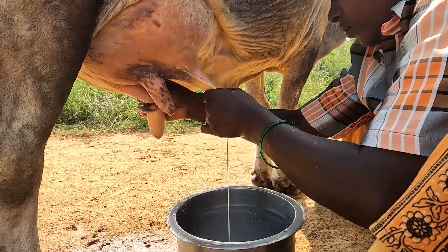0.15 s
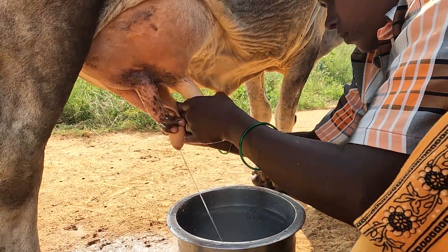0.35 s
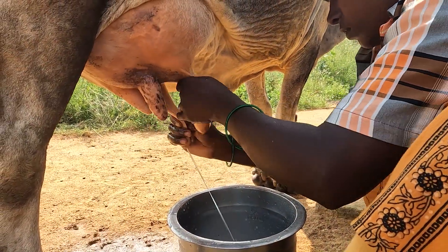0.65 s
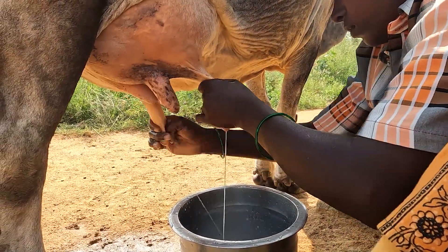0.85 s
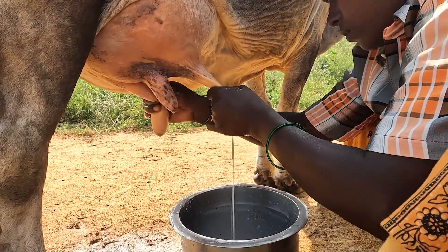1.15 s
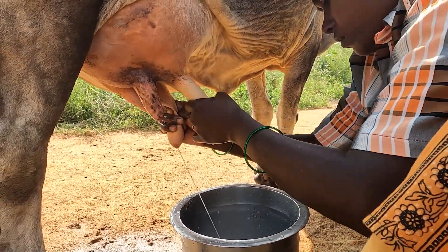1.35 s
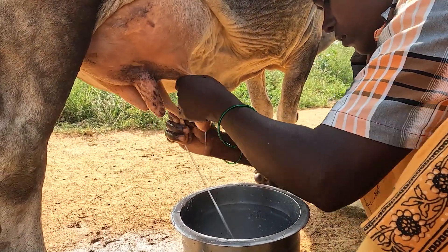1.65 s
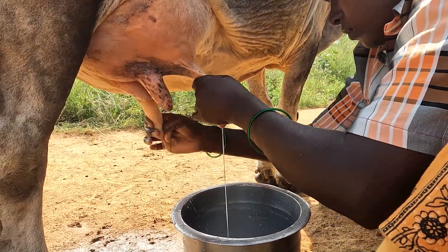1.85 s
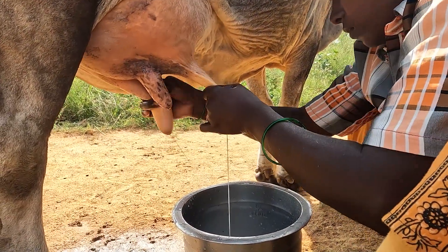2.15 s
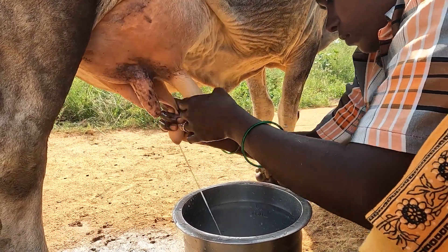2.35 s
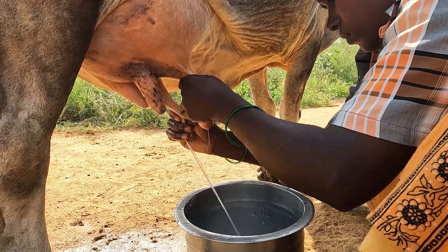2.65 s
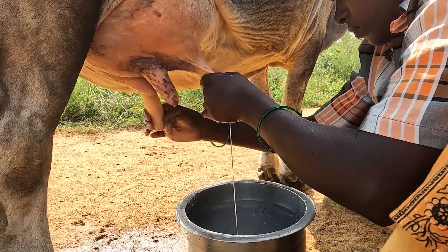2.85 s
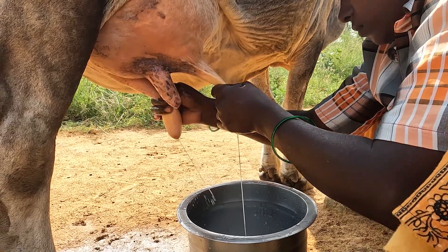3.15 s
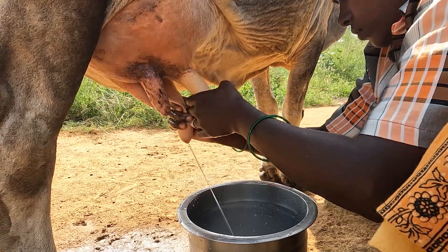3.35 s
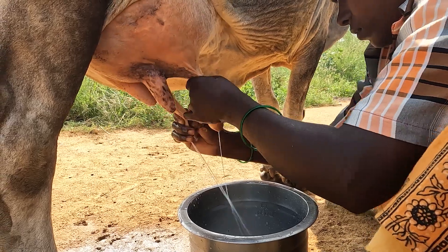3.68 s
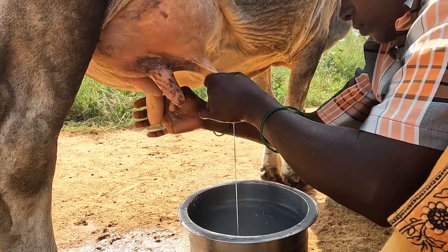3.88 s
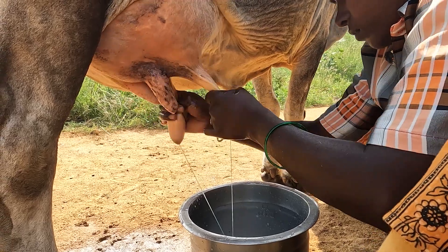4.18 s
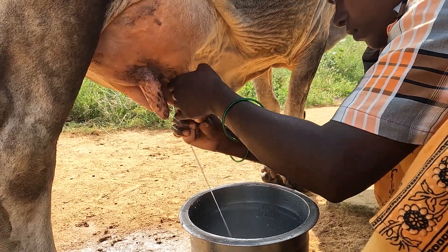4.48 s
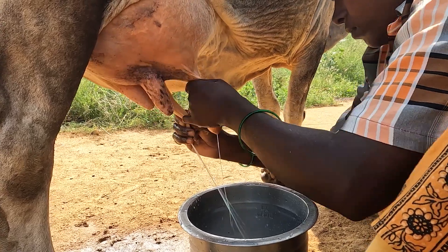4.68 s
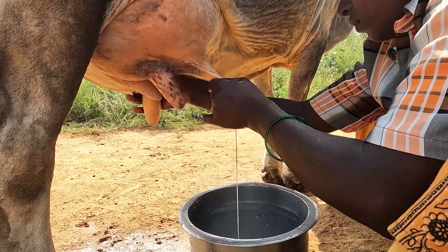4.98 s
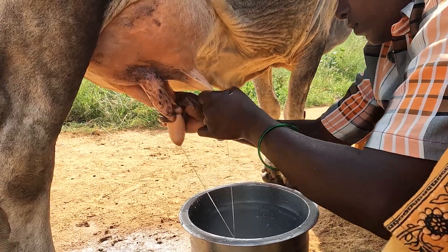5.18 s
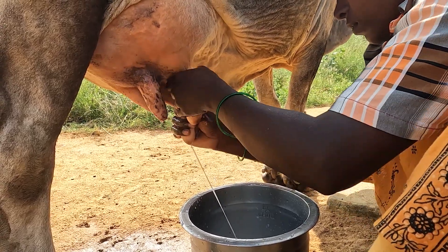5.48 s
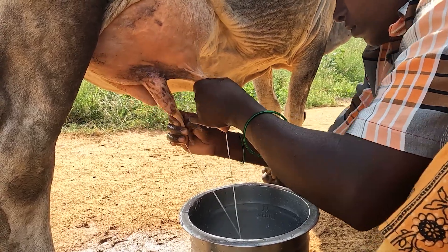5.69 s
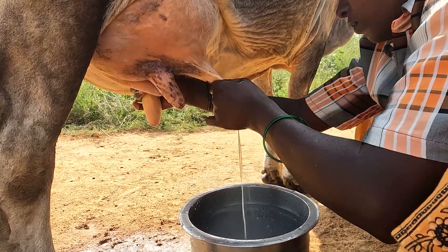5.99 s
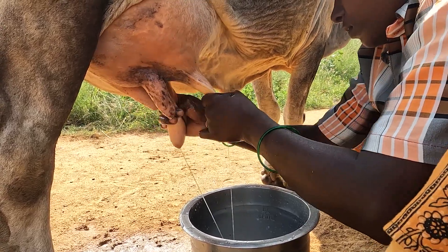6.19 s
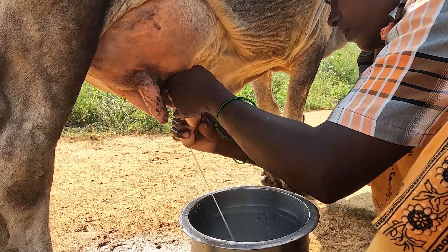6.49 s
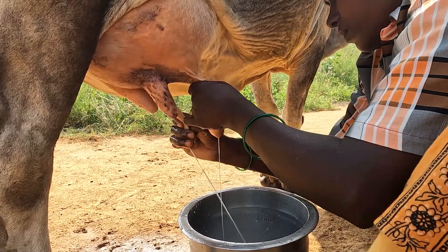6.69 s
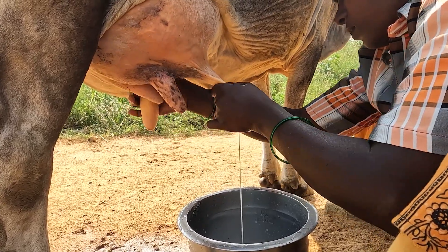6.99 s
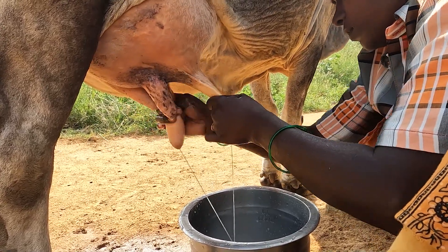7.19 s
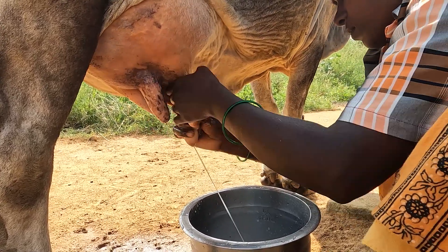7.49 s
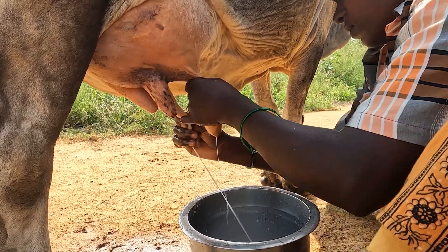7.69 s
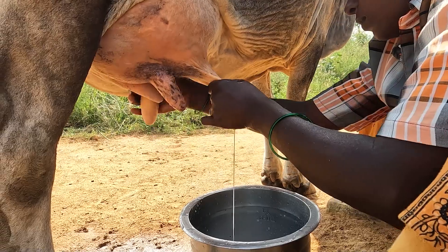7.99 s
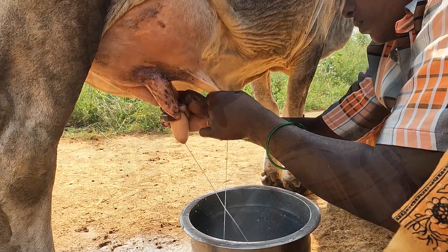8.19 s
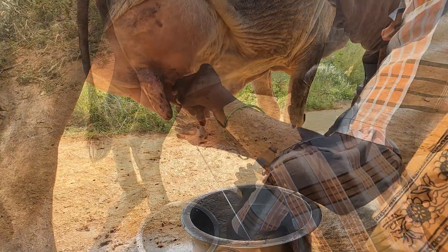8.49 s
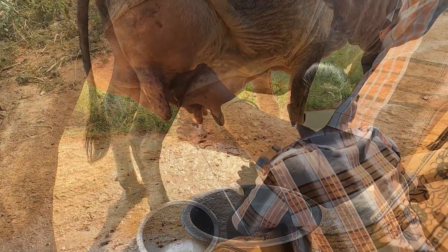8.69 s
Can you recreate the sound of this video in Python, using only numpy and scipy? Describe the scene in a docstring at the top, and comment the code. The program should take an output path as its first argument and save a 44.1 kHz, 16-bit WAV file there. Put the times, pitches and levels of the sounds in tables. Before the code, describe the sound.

Close stereo pickup outdoors of a cow being milked by hand. Alternating jets squirt into a steel pot roughly twice a second, one deeper and gurgling, the other brighter and splashier. Bubbly froth, fine spray, hollow gulps and pinging drips sit over a low rumble and faint hiss. It starts quietly, strengthens, then cuts off near the end, leaving silence and a barely audible rumble.

```python
"""A low outdoor rumble and a far hiss, then two jets of milk taking turns to squirt into a steel pot by hand.
Each jet is a rain of bubbles and spray coloured by the pot wall, and its plunging drives the pot's air column.
Jets surge in short swells, lumps of milk gulp as wavering tones, single bubbles and high drips are damped sines.
The sound rises slowly, stops dead, and after a short silence a faint rumble creeps back."""
import sys
import numpy as np
from scipy import signal
from scipy.fft import rfft, irfft, next_fast_len
from scipy.io import wavfile
from scipy.ndimage import uniform_filter1d, map_coordinates

SR = 44100
rng = np.random.default_rng(int(sys.argv[2]) if len(sys.argv) > 2 else 0)


def dump(signal):
    """Clip the signal to [-1, 1] and save it as 16-bit WAV at the path in sys.argv[1]."""
    limited = np.clip(np.atleast_2d(signal).T, -1, 1)
    pcm = np.round(limited * 32767).astype(np.int16)
    wavfile.write(sys.argv[1], SR, pcm)


N = 389844

# Level of the open air around the pot. Each row: time in seconds, rumble level in dB.
OUTDOOR_LEVEL = [(0.0, -47), (0.43, -47.5), (0.6, -41), (1.3, -41.5), (5, -40.5), (8.6, -39.5)]
# Quarter-wave modes of the air in the pot, lowest first.
# Each row: pitch in Hz, width in Hz of the plain resonance, power it is raised to (steepness of the skirts).
AIR_COLUMN = [(381, 118, 2.44), (1105, 152, 0.71)]
# Squeezes of a teat, far hand and near hand in turn. Each row: start in seconds, length in s,
# froth crest in s after the start, froth crest in dB, spray crest in s after the start, spray crest in dB,
# mist in dB over its share of the spray, boom delay in s, boom length in s, boom crest in s after the boom's
# own start, boom crest in dB, overtone crest in dB (it peaks with the spray).
SQUEEZES = [(0.0, 0.39, 0.35, -49, 0.11, -50.5, -26, 0.11, 0.32, 0.043, -47, -57.5),
            (0.448, 0.5, 0.31, -38.5, 0.29, -42, -7, 0.12, 0.4, 0.09, -48, -50.5),
            (0.947, 0.44, 0.24, -42.5, 0.024, -45, -7.5, 0.1, 0.67, 0.21, -42.5, -51),
            (1.414, 0.57, 0.25, -37, 0.34, -40, 5.5, 0.046, 0.3, 0.14, -42, -45.5),
            (1.953, 0.39, 0.37, -38.5, 0.064, -42, 1, 0.028, 0.33, 0.21, -38.5, -49.5),
            (2.45, 0.43, 0.26, -33, 0.3, -36.5, 2.5, 0.053, 0.35, 0.2, -39.5, -45.5),
            (2.889, 0.44, 0.77, -33.5, 0.35, -44, -1.5, 0.13, 0.38, 0.2, -37, -44),
            (3.39, 0.45, 0.28, -35, 0.3, -34, 0, 0.14, 0.36, .08, -43, -43.5),
            (3.9, 0.45, 0.77, -33, 0.025, -41, -2, 0.15, 0.33, 0.19, -38, -45.5),
            (4.387, 0.53, 0.33, -34, 0.3, -35.5, 5.5, 0.098, 0.37, 0.3, -39, -43),
            (4.93, 0.37, 0.3, -34.5, 0.025, -38.5, -2.5, .12, 0.31, 0.059, -36, -45.5),
            (5.393, 0.48, 0.21, -33.5, 0.37, -37, -3, 0.14, 0.59, 0.02, -41.5, -44.5),
            (5.902, 0.41, 0.41, -35.5, 0.3, -38, 6, 0.022, 0.37, 0.45, -36, -48),
            (6.325, 0.55, 0.27, -31.5, 0.34, -31.5, 2, 0.098, 0.34, 0.14, -40.5, -46),
            (6.895, 0.36, 0.36, -38, 0.074, -44.5, 4, 0.073, 0.49, 0.18, -38.5, -45.5),
            (7.357, 0.53, 0.4, -33.5, 0.48, -32.5, -6, 0.12, 0.39, 0.19, -39, -44),
            (7.926, 0.36, 0.32, -37, 0.065, -41, 2.5, 0.099, 0.4, 0.22, -40.5, -47),
            (8.417, 0.49, .05, -39, 0.14, -37.5, 2, 0.049, 0.21, 0.24, -38, -44)]
ATTACK_S, RELEASE_S, SPRAY_RELEASE_S = 0.0011, 0.022, 0.028  # edges of a jet; the spray thins out more slowly


def amp(db):
    """dB to gain."""
    return 10 ** (np.asarray(db) / 20)


def unit(x):
    """Scale to rms 1."""
    return x / np.sqrt(np.mean(x ** 2) + 1e-20)


def along(points, hz):
    """Read a curve of (Hz, value) points on a log frequency axis."""
    f, v = np.transpose(points)
    return np.interp(np.log(hz + 1), np.log(f + 1), v)


def curve(points):
    """One value per sample from (seconds, value) points."""
    s, value = np.transpose(points)
    return np.interp(np.arange(N) / SR, s, value)


def wobble(rate):
    """A smooth random curve, rate knots a second."""
    return map_coordinates(rng.standard_normal(int(N * rate / SR) + 4), [np.arange(N) * rate / SR])


def filtered(x, response):
    """Filter x by a complex response of frequency."""
    m = next_fast_len(N + SR // 2)
    return irfft(rfft(x, m) * response(np.fft.rfftfreq(m, 1 / SR)), m)[..., :N]


def resonance(f, hz, width):
    """One mode, gain 1 at its peak."""
    return 1j * f * width / (hz * hz - f * f + 1j * f * width)


def coloured(x, spectrum):
    """Replace the average colour of x by the given one, rms 1."""
    hz, power = signal.welch(x, SR, nperseg=256)
    return unit(filtered(x, lambda f: amp(along(spectrum, f)) / np.sqrt(np.interp(f, hz, power) + 1e-12)))


def patchy(x, depth_db):
    """Shift the colour at random in patches some 200 Hz wide and 50 ms long."""
    z = signal.stft(x, nperseg=512)[2]
    field = uniform_filter1d(rng.standard_normal(z.shape), size=2, axis=0)
    field = uniform_filter1d(field, size=9, axis=1)
    return signal.istft(z * amp(depth_db * unit(field)), nperseg=512)[1][:N]


def bubbles(s, gain, hz, cycles, rise, size, onset=12):
    """Damped sines with a soft start; the pitch climbs as each bubble nears the surface."""
    age = np.arange(size) / SR * hz[:, None] / cycles  # 1 = faded by 20 dB
    wave = np.sin(2 * np.pi * cycles * age * (1 + rise * age / 2))
    wave *= gain[:, None] * amp(-20 * age) * (1 - np.exp(-onset * age))
    wave *= np.hanning(2 * size)[size:]  # fade the tail to nothing
    where = np.round(s * SR).astype(int)[:, None] + np.arange(size)
    return np.bincount(where.ravel(), wave.ravel(), N + size)[:N]


def swarm(count, size, hz, octaves, cycles, scatter_db):
    """A steady random rain of bubbles of many sizes, rms 1."""
    u, z = rng.random((count, 2)), rng.standard_normal(count)
    pitch = np.clip(hz * 2 ** (octaves * z), 300, 15000)
    gain = amp(-scatter_db * np.log(1 - u[:, 1]).clip(-4))  # many soft, few loud
    return unit(bubbles(u[:, 0] * (N - 1) / SR, gain, pitch, cycles, 0.074, size))


def stroke_gain(start, length, crest, crest_db, slopes, attack_s, release_s, dribble_db):
    """Each squeeze opens fast, climbs to its crest, sags and shuts; a dribble bridges the gaps."""
    t = np.arange(0, N + 64, 32) / SR
    age = t - start[:, None]
    climb, sag = np.array(slopes)[np.arange(len(start)) % 2].T[..., None]
    late = age - crest[:, None]
    opening = 1 / (1 + np.exp(np.clip(-age / attack_s, -50, 50)))
    shutting = 1 / (1 + np.exp(np.clip((age - length[:, None]) / release_s, -50, 50)))
    level_db = crest_db[:, None] + np.where(late < 0, climb * late, -sag * late)
    power = (amp(level_db) * opening * shutting) ** 2
    mean_crest_db = uniform_filter1d(crest_db, size=3)  # over neighbouring squeezes
    dribble = amp(np.interp(t, start + crest, mean_crest_db) + dribble_db)
    return np.interp(np.arange(N) / SR, t, np.sqrt(power.sum(axis=0) + dribble ** 2))


def surged(gain, s, width, db):
    """Add short swells to a level, quicker up than down."""
    skew = 0.83  # narrows the rise and widens the fall by this factor
    t = np.arange(0, N + 64, 32) / SR
    late = (t - s[:, None]) / width[:, None]
    late = np.where(late < 0, late / skew, late * skew)
    swell = amp(db[:, None] - 12 * late ** 2) ** 2  # half power where late is a half
    return np.sqrt(gain ** 2 + np.interp(np.arange(N) / SR, t, swell.sum(axis=0)))


def far(spectrum):
    """Far noise of the open air with a slowly wavering level, rms 1."""
    noise = filtered(rng.standard_normal(N), lambda hz: amp(along(spectrum, hz)))
    return unit(noise * amp(1.1 * wobble(4.1)))


def outdoor_rumble():
    """Low noise of the open place, rms 1."""
    # Colour of the rumble. Each row: frequency in Hz, relative level in dB per Hz.
    rumble_colour = [(8, -42), (14, 2), (24, -3.5), (33, 1.5), (45, -1.5), (60, -0.5), (75, -7), (95, -3.5),
                     (130, -7), (200, -11.5), (280, -17.5), (450, -19.5), (600, -40), (900, -59)]
    return far(rumble_colour)


def far_hiss():
    """A distant hiss whose colour shifts in patches, near rms 1."""
    # Colour of the hiss. Each row: frequency in Hz, relative level in dB per Hz.
    hiss_colour = [(290, -48.5), (500, -17), (720, -8), (1100, -5), (1410, 3), (2470, 3), (3200, -21),
                   (4650, -11), (12200, -17.5), (15600, -56.5)]
    return patchy(far(hiss_colour), depth_db=4.5)


def shrill():
    """A thin wavering hiss, unrelated at the two ports, that dips between squeezes."""
    hz, width_hz = 12600, 1100  # the resonance is applied twice
    hiss = filtered(rng.standard_normal((2, N)), lambda f: resonance(f, hz, width_hz) ** 2)
    s, length = np.transpose(SQUEEZES)[:2]
    # climb and sag of 8 dB per s for both hands
    squeeze = stroke_gain(s, length, length / 2, 0 * s, [(8, 8)] * 2, ATTACK_S, SPRAY_RELEASE_S, dribble_db=0)
    return amp(-28.5 + 2.5 * wobble(7) + 3 * wobble(60)) * squeeze * unit(hiss)


def burble():
    """As the far jet takes over from the near one, large bubbles gurgle briefly."""
    s = np.transpose(SQUEEZES)[0]
    hand_db = np.array([-48.5, -70])[np.arange(len(s)) % 2]  # far hand, near hand (next to nothing)
    # the gurgle follows the outdoor level, relative to its last value
    db = hand_db + np.interp(s, *np.transpose(OUTDOOR_LEVEL)) - OUTDOOR_LEVEL[-1][1]
    gain = surged(0, s, width=np.full(len(s), 0.15), db=db)
    return gain * swarm(count=2500, size=900, hz=976, octaves=0.36, cycles=8.0, scatter_db=7.0)


def gulps():
    """A lump of milk plunges and rings the lowest air mode: a soft swell whose pitch wavers."""
    # Lumps plunging into the pot. Each row: swell centre in seconds, width in s, peak in dB before the waver.
    lumps = [(0.205, 0.0068, -38), (0.664, 0.0075, -41), (1.079, 0.0074, -41), (1.138, 0.0059, -40),
             (1.281, 0.0053, -45.5), (1.677, 0.026, -38), (1.885, 0.017, -31.5), (2.174, 0.021, -34),
             (2.29, 0.011, -33), (2.337, 0.014, -30.5), (2.572, 0.019, -33.5), (3.183, 0.017, -34),
             (3.263, 0.011, -32.5), (3.387, 0.016, -37.5), (3.594, 0.0094, -33), (3.641, 0.013, -34),
             (4.125, 0.02, -35), (4.189, 0.011, -37), (4.32, 0.0089, -34), (4.599, 0.011, -30.5),
             (4.639, 0.015, -32.5), (4.782, 0.011, -38), (5.137, 0.0097, -36.5), (5.248, 0.015, -37.5),
             (5.277, 0.01, -35.5), (5.335, 0.025, -37.5), (5.615, 0.0074, -35), (6.083, 0.011, -41),
             (6.267, 0.0091, -28), (6.584, 0.014, -36), (6.658, 0.014, -35), (6.694, 0.015, -40),
             (6.761, 0.0079, -34.5), (7.024, 0.0074, -37.5), (7.051, 0.01, -33), (7.099, 0.014, -34.5),
             (7.178, 0.014, -33.5), (7.302, 0.0095, -37), (7.601, 0.029, -40), (8.148, 0.0087, -34.5),
             (8.222, 0.014, -33)]
    s, width, db = np.transpose(lumps)[..., None]
    step = np.arange(-4000, 4000)
    where = (np.round(s * SR).astype(int) + step).clip(0, N - 1)
    hz = AIR_COLUMN[0][0] * (1 + 0.0711 * wobble(45))
    tone = np.sqrt(2) * np.sin(2 * np.pi * np.cumsum(hz) / SR) * amp(2.3 * wobble(60))
    swell = amp(db - 12 * (step / SR / width) ** 2)
    return tone * np.bincount(where.ravel(), swell.ravel(), N)


def plops_and_drips():
    """Single bubbles and high drips that stand out of the froth: damped sines, each opened by a tick."""
    # Single bubbles and high drips.
    # Each row: start in seconds, level in dB (trimmed below for ring and tick), pitch in Hz.
    single_drops = [(0.179, -28.5, 3070), (0.996, -35, 814), (1.891, -34, 1080), (1.975, -25.5, 1160),
                    (2.5014, -22.5, 2790), (2.591, -17.5, 2700), (2.955, -19, 3660), (2.975, -29, 950),
                    (3.0166, -32, 5200), (3.0873, -20, 2820), (3.2262, -23, 2490), (3.3584, -29, 5070),
                    (3.452, -38, 890), (4.282, -18.5, 2370), (4.2957, -25, 5600), (4.3955, -30, 4400),
                    (4.432, -33, 1150), (4.4359, -23.5, 5030), (4.9706, -19.5, 4050), (4.976, -28, 1120),
                    (5.306, -34.5, 6800), (5.354, -33, 6000), (5.837, -32.5, 1190), (5.848, -31, 1180),
                    (5.869, -25.5, 1130), (5.906, -28, 1147), (5.959, -25.5, 2460), (6.066, -27, 1120),
                    (6.2396, -19.5, 2480), (6.3608, -27.5, 2220), (6.915, -33, 1090), (6.953, -28, 1100),
                    (7.012, -30.5, 1090), (7.1252, -21, 2830), (7.6112, -14.5, 2620), (7.8926, -17, 4500),
                    (7.97, -22.5, 3370), (8.004, -25.5, 1080), (8.006, -23.5, 2740), (8.042, -18, 3500),
                    (8.179, -26, 2260), (8.46, -30.5, 870), (8.556, -35.5, 945), (8.585, -34, 846)]
    s, db, hz = np.transpose(single_drops)
    cycles = 10.3 * (2500 / hz[:, None]) ** 0.53  # low ones ring for more cycles
    ring = bubbles(s, amp(db + 1.0), hz, cycles, rise=0.027, size=900, onset=70)
    ring = ring * amp(1.5 * wobble(500))  # spray roughens the ring
    tick_hz = 6000 * 2 ** rng.normal(0, 0.95, len(s))
    return ring + bubbles(s, amp(db - 12), tick_hz, cycles=2.5, rise=0.1, size=128)


def through_wall(x):
    """The steel wall of the pot, damped by milk, adds its ringing modes to x."""
    # Modes of the wall. Each row: pitch in Hz, width in Hz, relative strength in dB.
    wall_modes = [(2586, 45, 1), (3364, 78, 2.5), (4140, 60, 9), (5170, 88, -4), (7400, 90, -9),
                  (10240, 400, 8.5)]
    modes = lambda f: sum(resonance(f, hz, width) * amp(db - 18.5) for hz, width, db in wall_modes)
    return filtered(x, lambda f: 1 + modes(f))


def froth(sputter):
    """Bubbles whipped up by the jets: deeper as the far jet goes on, brighter under the near jet; rms 1."""
    # Colour of the froth. Each row: frequency in Hz (scaled below), relative level in dB per Hz.
    froth_colour = [(710, -34), (1200, -14.5), (1390, -22.5), (1680, -5), (1890, -8.5), (2560, 2.5),
                    (3800, -9.5), (4940, -53.5), (8360, -120)]
    mix = swarm(count=19000, size=220, hz=2464, octaves=0.515, cycles=11.4, scatter_db=0)
    mix += 0.86 * rng.standard_normal(N)
    mix += 0.55 * swarm(count=1600, size=220, hz=2544, octaves=0.35, cycles=6.0, scatter_db=2.0)  # separate drops
    mix = patchy(mix, depth_db=3.0)  # the stream's point of impact wanders
    deep, bright = (coloured(mix, np.multiply(froth_colour, [shift, 1])) for shift in (0.96, 0.98))
    s, length = np.transpose(SQUEEZES)[:2]
    far_hand = np.arange(len(s)) % 2 == 0
    times = np.c_[s, s + length / 2, s + length - RELEASE_S]
    shares = np.outer(far_hand, [.5, 1, 1])
    sunk = np.interp(np.arange(N) / SR, times.ravel(), shares.ravel())  # share of the deep colour
    return unit(amp(sputter) * through_wall(sunk * deep + (1 - sunk) * bright))


def spray(sputter):
    """Droplets thrown up by the jets; the finest are a mist that hisses above the rest."""
    # Colour of the spray. Each row: frequency in Hz, relative level in dB per Hz.
    spray_colour = [(1760, -22), (3000, -2), (4060, -4.5), (4570, -8.5), (5030, -7.5), (6450, -14),
                    (7100, -14.5), (8670, -26.5), (10600, -20.5), (12700, -26), (14100, -35),
                    (15600, -54.5)]
    mix = swarm(count=45000, size=96, hz=6030, octaves=0.7, cycles=5.5, scatter_db=2.5)
    mix += 0.52 * rng.standard_normal(N)
    # droplets ticking on steel
    mix += 0.55 * swarm(count=7000, size=64, hz=5540, octaves=0.66, cycles=2.5, scatter_db=2.5)
    mix = coloured(patchy(mix, depth_db=3.5), spray_colour)  # the stream's point of impact wanders
    drops = unit(amp(1.12 * sputter) * through_wall(mix))
    mist_hz = 8000
    mist = filtered(drops, lambda f: 1 / (1 + (mist_hz / (f + 1)) ** 8))
    columns = np.transpose(SQUEEZES)
    s, length, mist_db = columns[0], columns[1], columns[6]
    mist_gain = amp(np.interp(np.arange(N) / SR, s + length / 2, mist_db) + 0.9 * wobble(130))
    return drops - mist + mist_gain * mist


def air_mode(sputter, hz, width, steep):
    """The air column of the pot, driven at one mode by lumps of milk plunging in; rms 1."""
    push = rng.standard_normal(N) * amp(1.3 * sputter + 2.4 * wobble(55))
    return unit(filtered(push, lambda f: resonance(f, hz, width) ** steep))


def jets():
    """The streams break up unevenly, so froth, spray and the pot's air all sputter together."""
    # Climb to the crest and sag after it. Each row (far hand, near hand): climb in dB per s, sag in dB per s.
    froth_slopes, spray_slopes = [(18, 23), (25, 44)], [(15, 54), (22, 15)]
    boom_slopes, overtone_slopes = [(30, 15), (35, 14)], [(4, 6.1), (4, 14)]
    # Short surges of a jet. Each row: centre in seconds, width in s, froth peak in dB, spray peak in dB.
    spurts = [(0.465, 0.03, -47, -50), (0.596, 0.023, -35.5, -49), (0.74, 0.012, -39.5, -49),
              (1.071, 0.0091, -36, -54), (1.306, 0.029, -39.5, -46), (1.447, 0.0068, -31.5, -56),
              (1.579, 0.024, -36, -53), (1.667, 0.006, -37, -40), (1.853, 0.033, -41.5, -41),
              (2.072, 0.018, -36, -56), (2.249, 0.03, -29.5, -42.5), (2.507, 0.0092, -36.5, -46),
              (2.593, 0.018, -31.5, -36), (2.612, 0.015, -28, -39.5), (2.661, 0.014, -35.5, -39.5),
              (2.693, 0.012, -29.5, -37), (2.744, 0.017, -34, -40.5), (2.956, 0.023, -38.5, -40),
              (3.089, 0.011, -34.5, -35.5), (3.179, 0.028, -32.5, -42), (3.228, 0.016, -28.5, -34),
              (3.527, 0.024, -36, -37.5), (3.566, 0.065, -33, -36.5), (3.683, 0.018, -36.5, -34.5),
              (3.738, 0.019, -34, -35.5), (3.933, 0.047, -43, -37), (4.022, 0.035, -43, -37),
              (4.235, 0.045, -32.5, -53), (4.282, 0.0036, -40, -52.6), (4.419, 0.025, -35, -39),
              (4.667, 0.0071, -29.5, -40.5), (4.723, 0.0067, -30, -37), (4.763, 0.019, -30, -33),
              (5.092, 0.016, -36.5, -47), (5.201, 0.0057, -35, -40.5), (5.416, 0.03, -32.5, -29),
              (5.483, 0.023, -31.5, -36.5), (5.545, 0.061, -31, -39), (5.699, 0.053, -34, -34.5),
              (6.052, 0.018, -31.5, -38), (6.13, 0.023, -37, -36.5), (6.222, 0.0061, -39, -47.5),
              (6.247, 0.01, -33, -51), (6.386, 0.023, -25.5, -35.5), (6.471, 0.014, -28, -34),
              (6.616, 0.013, -34, -28), (6.656, 0.011, -27, -34), (6.705, 0.026, -31, -31),
              (6.763, 0.0054, -30, -24.5), (7.129, 0.044, -34.5, -43), (7.221, 0.049, -31, -40),
              (7.562, 0.035, -30.5, -42.5), (7.623, 0.038, -34, -35), (7.651, 0.033, -31.5, -27),
              (7.706, 0.033, -33.5, -30), (7.748, 0.019, -31, -23), (8.044, 0.0084, -41, -36),
              (8.12, 0.019, -36, -42.5), (8.182, 0.014, -27.5, -41), (8.236, 0.025, -29, -41.5),
              (8.461, 0.024, -37, -34), (8.558, 0.0084, -34.5, -33.5)]
    (s, length, froth_at, froth_db, spray_at, spray_db, _,
     delay, boom_length, boom_at, boom_db, overtone_db) = np.transpose(SQUEEZES)
    # dribble_db: what is left between jets, under their mean crest
    froth_gain = stroke_gain(s, length, froth_at, froth_db, froth_slopes,
                             ATTACK_S, RELEASE_S, dribble_db=-19.5)
    spray_gain = stroke_gain(s, length, spray_at, spray_db, spray_slopes,
                             ATTACK_S, SPRAY_RELEASE_S, dribble_db=-11.5)
    boom_gain = stroke_gain(s + delay, boom_length, boom_at, boom_db, boom_slopes,
                            attack_s=0.012, release_s=0.014, dribble_db=-14.5)
    overtone_gain = stroke_gain(s, length, spray_at, overtone_db, overtone_slopes,
                                ATTACK_S, RELEASE_S, dribble_db=-5.5)
    spurt_s, spurt_width, spurt_froth_db, spurt_spray_db = np.transpose(spurts)
    froth_gain = surged(froth_gain, spurt_s, spurt_width, spurt_froth_db)
    spray_gain = surged(spray_gain, spurt_s, spurt_width, spurt_spray_db)
    sputter = 0.5 * wobble(45) + 1.4 * wobble(170)  # dB
    out = froth_gain * froth(sputter) + spray_gain * spray(sputter)
    for mode, gain in zip(AIR_COLUMN, (boom_gain, overtone_gain)):
        out += gain * air_mode(sputter, *mode)
    return out


def ports(x):
    """Two close microphone ports: a level and phase step between them, and scattered sound that differs."""
    # Likeness of the ports before the image is narrowed. Each row: frequency in Hz, left-right correlation.
    likeness = [(30, 1), (200, 1), (700, 0.97), (1500, 0.98), (3000, 0.94), (6000, 0.88), (10000, 0.88),
                (14000, 0.35)]
    # Level step between the ports. Each row: frequency in Hz, left minus right in dB.
    louder_left = [(60, 0), (200, 0), (380, -1), (700, -1), (1300, -.4), (4400, -.6), (8100, 1), (15000, 4)]
    # Phase step between the ports. Each row: frequency in Hz, left minus right in radians.
    left_lead = [(100, 0), (1000, -.2), (1700, -.35), (3000, -.8), (4800, -.45), (5900, -.7), (7200, -.3),
                 (11800, -.1), (13400, -2.5)]
    z = signal.stft(x, nperseg=256)[2]
    scrambled = z * np.exp(2j * np.pi * rng.random(z.shape))
    scattered = signal.istft(scrambled, nperseg=256)[1][:N]
    scattered *= np.std(x) / np.std(scattered)
    turn = lambda hz: np.arccos(np.clip(along(likeness, hz), 0, 1)) / 2
    step = lambda hz: np.sqrt(amp(along(louder_left, hz))) * np.exp(.5j * along(left_lead, hz))
    mid, side = filtered(np.array([x, scattered]), lambda hz: np.array([np.cos(turn(hz)), np.sin(turn(hz))]))
    return filtered(np.array([mid + side, mid - side]), lambda hz: np.array([step(hz), 1 / step(hz)]))


def scene():
    """Milking in the open up to the stop, silence, then the faint rumble in both ports alike."""
    # The image starts narrow and opens. Each row: time in seconds, gain of the side signal in dB.
    opening_image = [(0, -47), (.5, -29), (1.6, -1.5)]
    # Faint rumble after the silence. Each row: time in seconds, level in dB.
    rumble_return = [(8.78, -88.5), (8.8, -81.5), (8.84, -63)]
    stop_s = 8.604  # the sound is cut here
    rumble, open_db = outdoor_rumble(), curve(OUTDOOR_LEVEL)
    outdoors = amp(open_db) * (rumble + amp(-13.5) * far_hiss())
    milking = ports(outdoors + burble() + gulps() + plops_and_drips() + jets())
    # a second low rumble, opposite in the two ports, widens the bass
    milking += amp(open_db - 16.5) * outdoor_rumble() * [[1], [-1]]
    mid = milking.mean(axis=0)
    side = (milking[0] - milking[1]) / 2 * amp(curve(opening_image))
    milking = np.array([mid + side, mid - side])
    milking += shrill() * amp(open_db + [[1.5], [-1.5]])  # 3 dB louder at the left port
    t = np.arange(N) / SR
    on = amp(-5000 * (t - stop_s).clip(0))  # falls 5 dB per ms
    return milking * on + (t > rumble_return[0][0]) * amp(curve(rumble_return)) * rumble


def record(dry):
    """The top treble rolls off steeply, with silence above 15.7 kHz."""
    top_hz = 15730
    return filtered(dry, lambda hz: (hz < top_hz) / (1 + (hz / 14800) ** 30))


dry = scene()
out = record(dry)
dump(out)
```